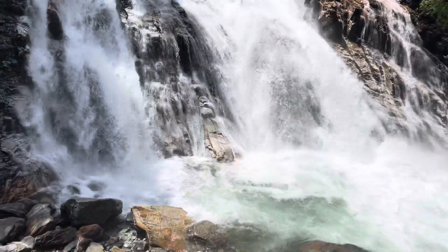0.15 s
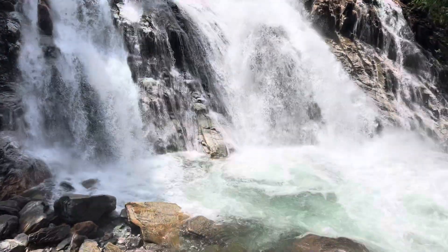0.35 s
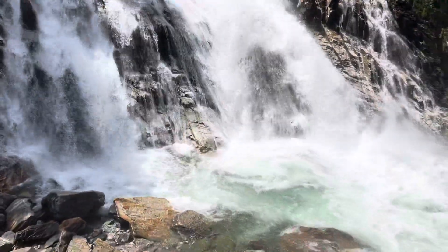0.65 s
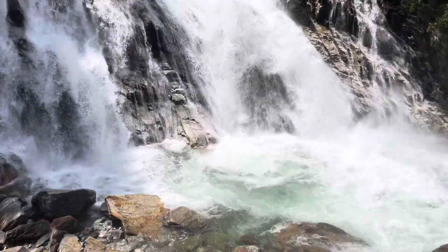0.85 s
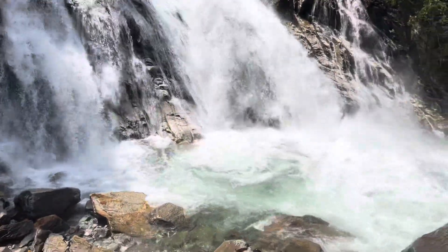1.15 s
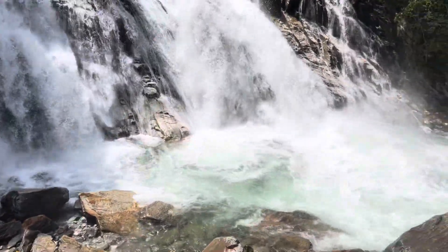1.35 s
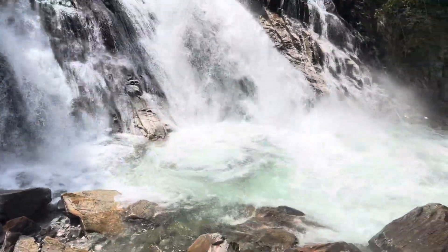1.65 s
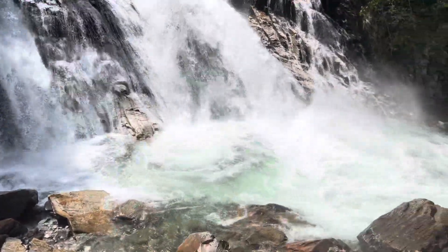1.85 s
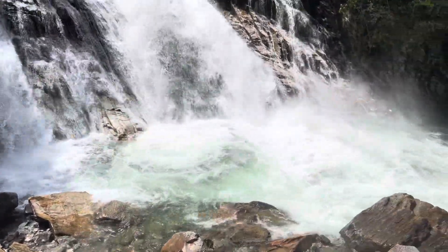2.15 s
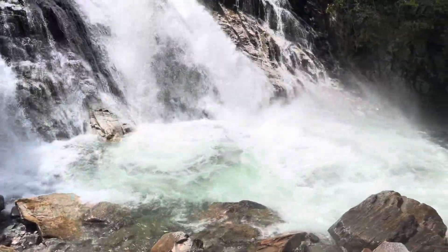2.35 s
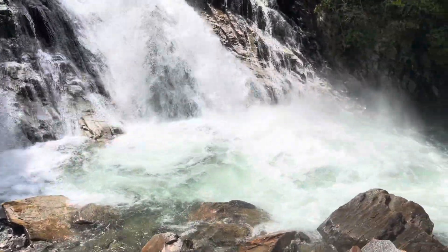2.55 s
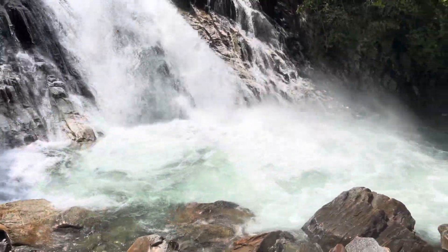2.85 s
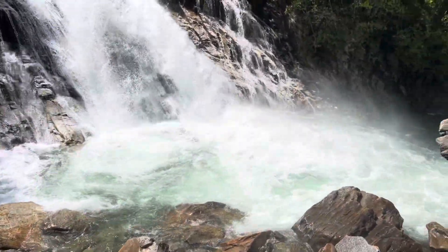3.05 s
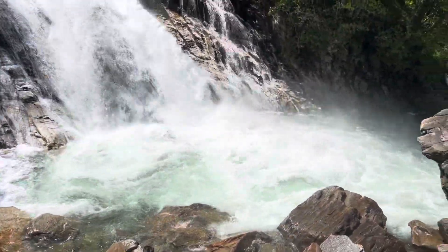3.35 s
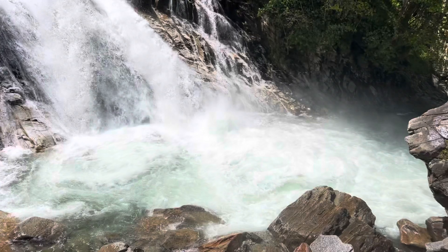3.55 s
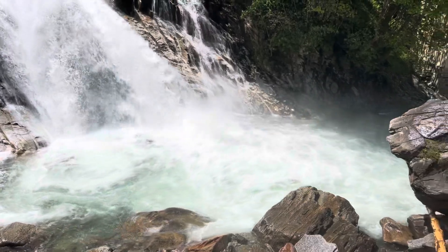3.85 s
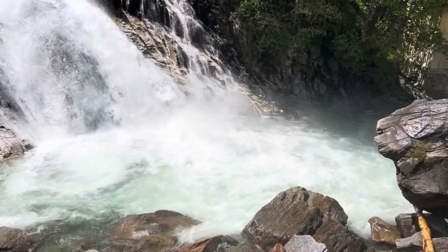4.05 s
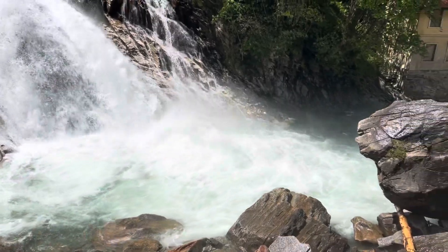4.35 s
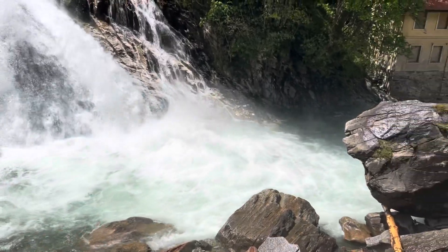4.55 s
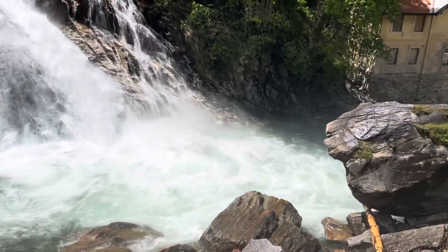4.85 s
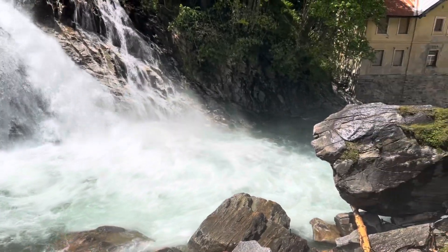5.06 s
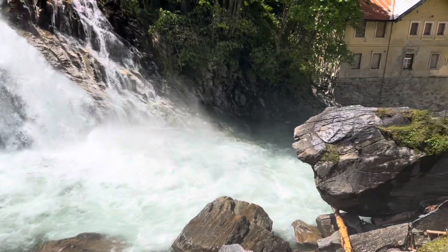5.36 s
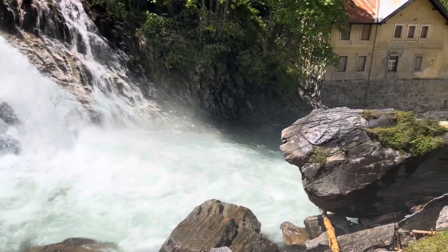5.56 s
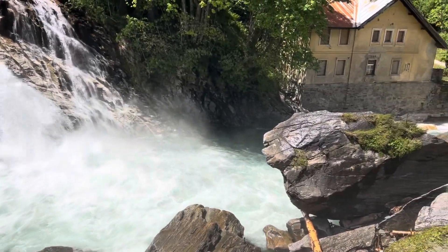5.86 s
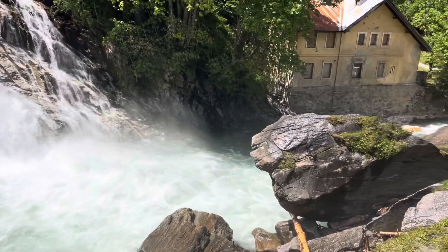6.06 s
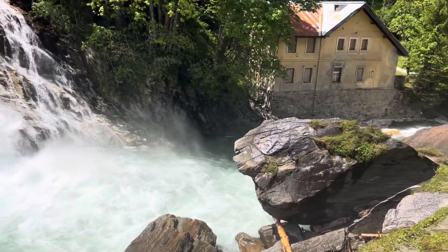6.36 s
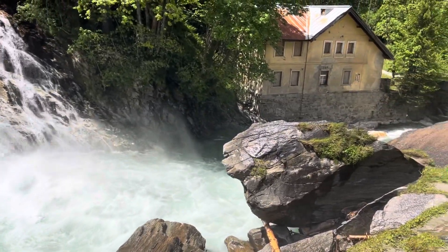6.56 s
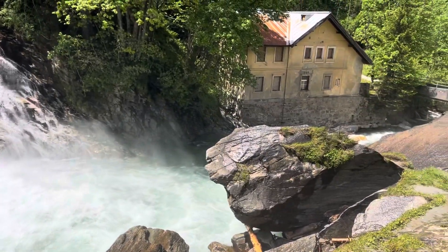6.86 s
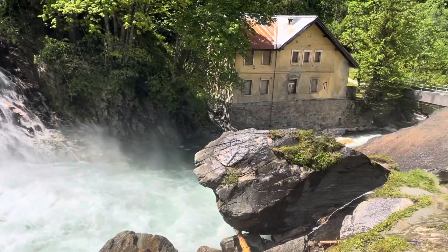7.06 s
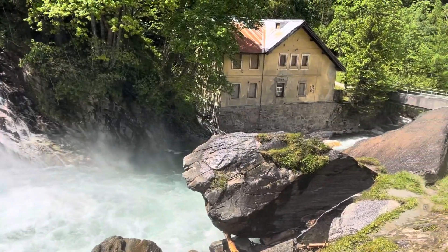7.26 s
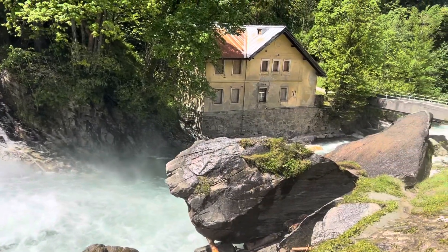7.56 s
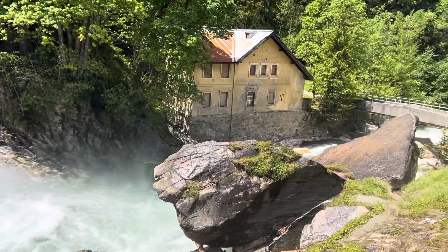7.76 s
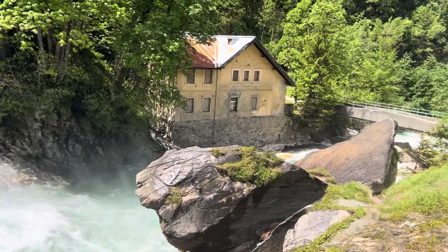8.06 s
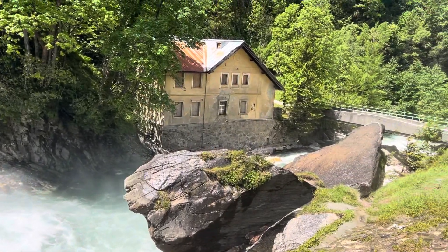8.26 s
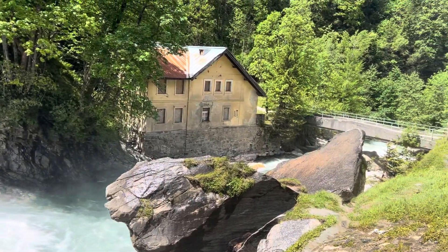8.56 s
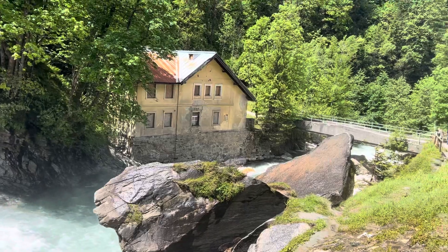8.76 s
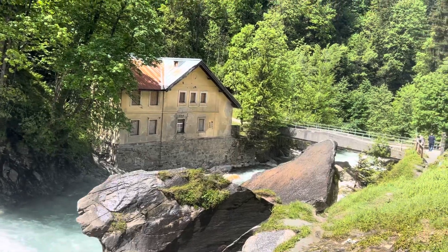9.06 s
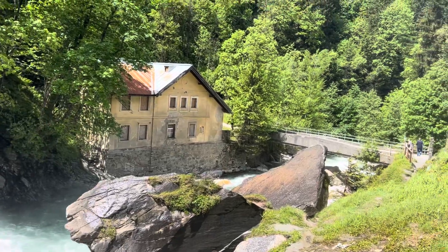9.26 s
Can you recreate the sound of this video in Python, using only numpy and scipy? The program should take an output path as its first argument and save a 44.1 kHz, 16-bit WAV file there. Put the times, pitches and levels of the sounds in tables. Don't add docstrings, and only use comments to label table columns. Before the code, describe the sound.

A heavy, steady rush of water plunging into a rocky pool, wide and noisy, without separate drips or gurgles. Over it come irregular deep wind bumps and throbbing gusts on an unprotected hand-held microphone, clustered around two and a half to three seconds, with another hard burst past six. Afterwards the low roar sags for a moment, then returns, and the last seconds are calmer and a little quieter.

```python
import sys
import numpy as np
from scipy import signal
from scipy.fft import rfft, irfft, next_fast_len
from scipy.io import wavfile
from scipy.ndimage import uniform_filter1d

SR = 44100
rng = np.random.default_rng(int(sys.argv[2]) if len(sys.argv) > 2 else 0)


def unload_audio(sound):
    columns = np.transpose(np.atleast_2d(sound))
    steps = np.round(np.clip(columns, -1, 1) * 32767)
    wavfile.write(sys.argv[1], SR, steps.astype(np.int16))


def level_to_linear(level):
    exponent = np.asarray(level, float) / 20
    return 10 ** exponent


N = 414981
SIZE = next_fast_len(N)

# start_s, strength_db, fineness_db (flutter over throb)
STEADY_DRAUGHT = [(0, -25, 0), (1.45, -23.5, -2), (1.62, -32.5, 4), (1.7, -24, 0.5), (2.4, -26, -1),
                  (3.2, -22.5, -2.5), (3.3, -33, 6), (4.12, -35.5, -0.5), (4.33, -30.5, 4.5),
                  (5.1, -25.5, -1), (5.6, -33, 7), (6.15, -22.5, -1), (6.55, -22.5, 2), (6.62, -34.5, 0.5),
                  (7.3, -33.5, -5), (7.8, -32, 0.5), (8.42, -35.5, 1.5), (9.41, -30, -0.5)]
# centre_s, strength_db, fineness_db, length_s
DRAUGHT_PUFFS = [(.02, -21, -7, .06), (0.274, -21, -13, .05), (0.384, -24.5, -3, .05), (0.49, -22, -7, .03),
                 (.84, -26, -9, 0.035), (1.693, -22, -4, 0.072), (1.996, -22.5, -14, .06),
                 (2.16, -24, -4, .06), (2.478, -16, -17, 0.054), (2.61, -23.5, -1, .08),
                 (2.713, -14.5, -7.5, .07), (2.844, -19.5, -2.5, 0.039), (3.118, -24, -14, .05),
                 (3.415, -25.5, 2, 0.086), (3.69, -25.5, -4, 0.094), (4.432, -28, -13, .05),
                 (4.535, -30, 4.5, 0.052), (5.03, -24, -6, .06), (5.338, -23, -16, .03),
                 (5.45, -24.5, 0.5, .06), (5.833, -34, -7, .06), (6.242, -12, 1.5, 0.067),
                 (6.332, -14.5, -3, .06), (6.43, -20, -2.5, 0.12), (6.91, -29, 1, 0.15),
                 (7.645, -33, -1, 0.078), (7.993, -28.5, 3, 0.046), (8.174, -29.5, 3, 0.031),
                 (8.55, -34, 8, .06), (8.74, -29.5, 0, .06)]
# centre_s, peak_db, pitch_hz, length_cycles
EDDY_THUMPS = [(.03, -11, 120, 1.5), (0.656, -15, 90, 1.5), (1.24, -13, 90, 1.6), (1.776, -10.5, 90, 1.3),
               (2.526, -5, 200, 1.4), (2.69, -3.5, 70, 1.6), (2.727, -2.5, 205, 1.1),
               (2.749, -8.5, 79, 2.7), (2.878, -6, 100, 0.85), (3.027, -7.5, 220, 1.3),
               (4.647, -15, 200, 0.81), (4.844, -9, 180, 1.8), (5.35, -11, 100, 1.7), (6.235, -6, 109, 1.5),
               (6.261, -7, 200, 0.81), (6.326, -5, 129, 2.2), (6.521, -9, 80, 2.3), (7.944, -16, 60, 1.7),
               (2.999, -15, 150, 1.3), (6.898, -17, 250, 1), (8.07, -14, 250, 1.6), (8.529, -17, 250, 1.1),
               (9.022, -7.5, 350, 1.5), (9.2, -10, 250, 1.1)]
# pitch_hz, level_db
THROB_COLOUR = [(10, -60), (35, -11), (55, -0.5), (85, 0.5), (130, -3.5), (200, -15), (300, -28),
                (2000, -110)]
# pitch_hz, level_db
FLUTTER_COLOUR = [(20, -70), (80, -8), (150, -2), (230, 1), (330, -4), (480, -9), (700, -13.5),
                  (1100, -28.5), (5000, -110)]
# start_s, attack_s, hold_s, release_s, roar_depth_db, spray_depth_db
GAIN_DUCKS = [
    (6.15, 0.5, .05, 0.45, 1.5, 1),
    (6.746, 0.26, 0.18, 0.42, 5.5, 0.5),
]
# time_s, share_turned_away (0-1)
HAND_TURN = [
    (0, 0.05),
    (1.5, 0),
    (3.5, 0.38),
    (6, 0.69),
    (8, 0.94),
    (9.41, 1),
]
# pitch_hz, level_db (per Hz)
SPRAY_COLOUR = [(6500, -69.5), (9000, -69), (11000, -71), (13000, -73), (14400, -73), (16000, -78)]
# pitch_hz, level_db (per Hz), left_over_right_db, likeness (0-1), right_lead_rad
FALL_FACING = [(250.0, -50, -3, 0.9, 0.21), (440, -51, -3.5, 0.76, 0.2), (685, -53, -0.5, 0.64, -0.82),
               (1060, -55.5, 0.5, 0.7, -0.77), (1280, -59, 2, 0.44, -0.42), (1540, -60, -1, 0.3, 2.75),
               (1940, -63, -0.5, 0.53, -0.33), (2300.0, -64.5, 4.5, 0.54, 1.1),
               (2800.0, -65, 4.5, 0.38, -0.3), (3500.0, -65, 4, 0.62, -0.36), (4520, -64.5, 2, 0.55, 0.3),
               (5370, -67, 1.5, 0.55, 0.84), (6250, -69.5, 5, 0.15, 0.38), (6900, -65.5, 2, 0.8, -0.66)]
FALL_TURNED = [(250.0, -51.5, 0, 0.63, 0), (430, -53.5, 1.5, 0.31, 0.1), (670, -53, 2, 1, -1.75),
               (1000, -57, 2.5, 0.42, -2), (1320, -58.5, -1.5, 0.51, -3), (1660, -61, -2.5, 0.4, -5),
               (2080, -63.5, -1.5, 0.65, -6), (2360, -64, 2, 0.48, -7), (2700, -68.5, 7, 0.39, -7.5),
               (3500.0, -67, 4.5, 0.76, -7.0), (4420, -68.5, 4, 0.52, -8), (5370, -70.5, 2, 0.35, -5.5),
               (6300.0, -73, 5.5, 0.3, -5.5), (7040, -71.5, 4, 0.69, -8)]
# pitch_hz, width_hz, depth_db
PATH_DIP = (1800, 80, -4.5)

SPRAY_FROM_HZ = 6750


def rms_one(x):
    return x / np.sqrt(np.mean(x ** 2) + 1e-20)


def in_time(rows):
    s, *columns = np.transpose(rows)
    return [np.interp(np.arange(N) / SR, s, c) for c in columns]


def in_pitch(rows):
    hz = np.fft.rfftfreq(SIZE, 1 / SR) + 1e-3
    at_hz, *columns = np.transpose(rows)
    return [hz] + [np.interp(np.log(hz), np.log(at_hz), c) for c in columns]


def back(spectrum):
    return irfft(spectrum, SIZE)[..., :N]


def above(hz, edge_hz, order):
    return 1 / (1 + (edge_hz / hz) ** order)


def drift(rate_hz):
    every = 40
    r = np.exp(-2 * np.pi * rate_hz * every / SR)
    noise = rng.standard_normal(N // every + 2002)
    slow = signal.lfilter([1], [1, -2 * r, r * r], noise)[2000:]
    return np.interp(np.arange(N) / every, np.arange(len(slow)), rms_one(slow))


def port_noise(tilt_db, alike, lead):
    shared, own = rfft(rng.standard_normal((2, SIZE)))
    alike = np.clip(alike, 0, 1)
    left = level_to_linear(tilt_db / 2) * shared
    right = alike * np.exp(1j * lead) * shared + np.sqrt(1 - alike ** 2) * own
    return np.array([left, level_to_linear(-tilt_db / 2) * right])


def draught():
    strength_db, fine_db = in_time(STEADY_DRAUGHT)
    power = level_to_linear(2 * np.array([strength_db, strength_db + fine_db]))
    for s, puff_db, puff_fine_db, length in DRAUGHT_PUFFS:
        first = max(round((s - 2 * length) * SR), 0)
        at = np.arange(first, round((s + 2 * length) * SR))
        bell = np.exp(-(2 * (at / SR - s) / length) ** 2)
        power[:, at] += level_to_linear(2 * np.array([[puff_db], [puff_db + puff_fine_db]])) * bell
    return 10 * np.log10(power)


def buffet(colour, level_db, lead, lumps, alike, even_s):
    hz, colour_db = in_pitch(colour)
    left, right = port_noise(0, alike, 0) * level_to_linear(colour_db)
    right = np.cos(lead) * back(right) + np.sin(lead) * back(1j * right)
    air = np.array([back(left), right])
    span = int(even_s * SR)
    power = uniform_filter1d((air ** 2).mean(axis=0), span)
    power = uniform_filter1d(power, span)
    return rms_one(air / np.sqrt(power) * lumps) * level_to_linear(level_db)


def thumps():
    out = np.zeros((2, N))
    for s, peak_db, hz, cycles in EDDY_THUMPS:
        at = round(s * SR) + np.arange(-SR // 20, SR // 20)
        at = at[at >= 0]
        t = at / SR - s
        skew = np.array([[-.2], [.2]]) + rng.uniform(0, 2 * np.pi)
        bell = np.exp(-(2.3 * t * hz / cycles) ** 2)
        out[:, at] += level_to_linear(peak_db - 2.5) * bell * np.cos(2 * np.pi * hz * t + skew)
    return out


def ducking():
    t = np.arange(N) / SR
    depth_db = np.zeros((2, N))
    for s, attack, hold, release, roar_db, spray_db in GAIN_DUCKS:
        shape = np.interp(t, np.cumsum([s, attack, hold, release]), [0, 1, 1, 0])
        depth_db += shape * np.array([[roar_db], [spray_db]])
    return depth_db


def spray(spray_db):
    lag_s = .000261
    hz, level_db = in_pitch(SPRAY_COLOUR)
    mist = port_noise(0, .999, 2 * np.pi * hz * lag_s) * level_to_linear(level_db)
    mist = mist * np.sqrt(above(hz, SPRAY_FROM_HZ, order=40))
    return rms_one(back(mist)) * level_to_linear(spray_db + 6.5 + 0.42 * drift(6.0))


def plunge(view, roar_db, splash_db):
    hz, level_db, tilt_db, alike, lead = in_pitch(view)
    dip_hz, width_hz, dip_db = PATH_DIP
    level_db = level_db + dip_db * np.exp(-((hz - dip_hz) / width_hz) ** 2)
    band = above(hz, 380, order=4) * (1 - above(hz, SPRAY_FROM_HZ, order=40))
    water = port_noise(tilt_db, 1.11 * alike, lead) * level_to_linear(level_db) * np.sqrt(band)
    high = above(hz, dip_hz, order=8)
    roar_swell_db = 0.42 * drift(3.3) + 0.22 * drift(21)
    roar = rms_one(back(water * np.sqrt(1 - high))) * level_to_linear(roar_db + 4.0 + roar_swell_db)
    splash_swell_db = 0.56 * drift(2.7) + .2 * drift(16)
    splash = rms_one(back(water * np.sqrt(high))) * level_to_linear(splash_db + 1.5 + splash_swell_db)
    return roar + splash


def scene():
    throb_db, flutter_db = draught()
    lead = np.clip(0.22 + 0.026 * (throb_db + 22.5), 0, 1)
    eddies = drift(15.0)
    throb_lumps = level_to_linear(1.3 * eddies + 2.3 * drift(10.4))
    throb = buffet(THROB_COLOUR, throb_db - 0.5, lead, throb_lumps, alike=0.9, even_s=0.04)
    flutter_lumps = level_to_linear(1.3 * eddies + 1.86 * drift(42))
    flutter = buffet(FLUTTER_COLOUR, flutter_db - 0.5, 1.8 * lead, flutter_lumps, alike=0.87, even_s=0.028)

    turn = np.clip(in_time(HAND_TURN)[0], 0, 1)
    shadow = turn ** 11
    roar_duck_db, spray_duck_db = ducking()
    roar_db = -30 - 2 * turn - roar_duck_db
    splash_db = -31 - 1.3 * shadow
    spray_db = -37 - 3 * shadow - spray_duck_db
    facing = np.sqrt(1 - turn) * plunge(FALL_FACING, roar_db, splash_db)
    turned = np.sqrt(turn) * plunge(FALL_TURNED, roar_db, splash_db)
    return throb + flutter + thumps() + spray(spray_db) + facing + turned


def low_pass(x):
    return signal.sosfilt(signal.butter(12, 15760, fs=SR, output="sos"), x)


def record(dry):
    rumble_cut = signal.butter(2, 36, "high", fs=SR, output="sos")
    cut = signal.sosfilt(rumble_cut, dry)
    mix = 1.566 * np.tanh(cut / 1.45)
    return low_pass(mix)


dry = scene()
out = record(dry)
unload_audio(out)
```